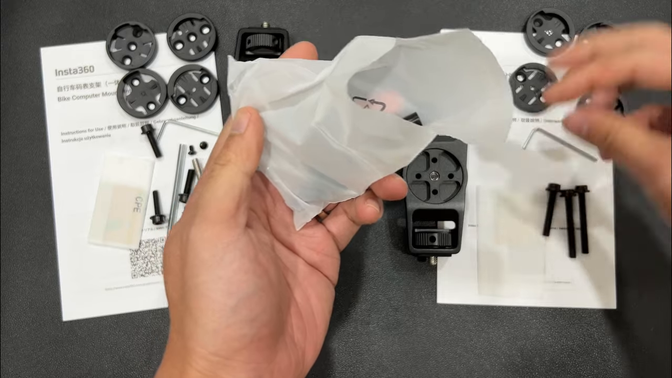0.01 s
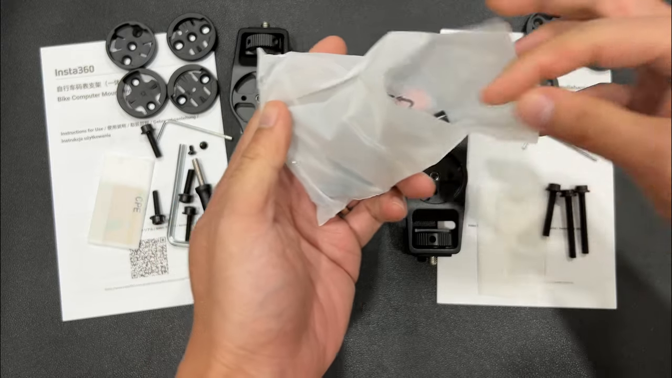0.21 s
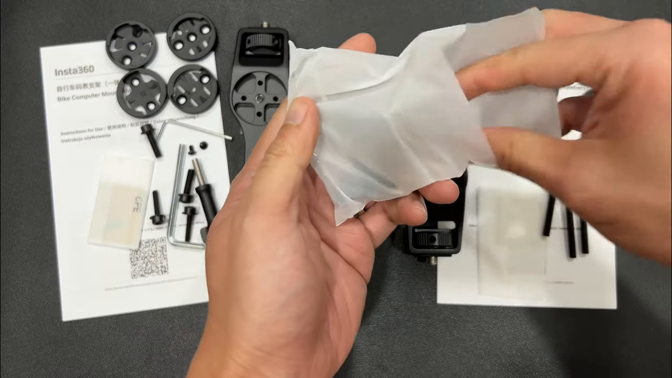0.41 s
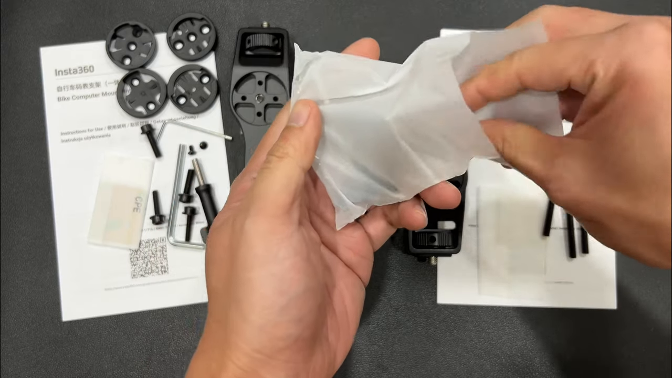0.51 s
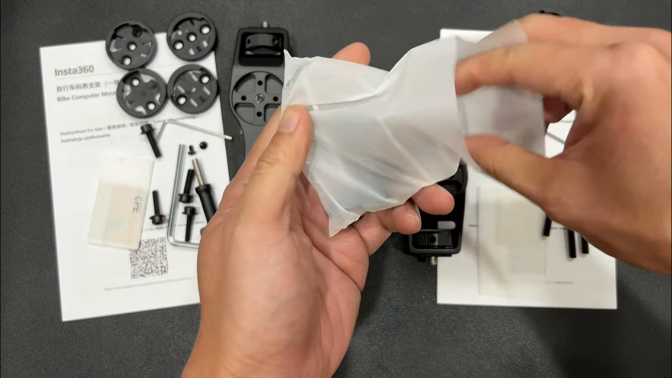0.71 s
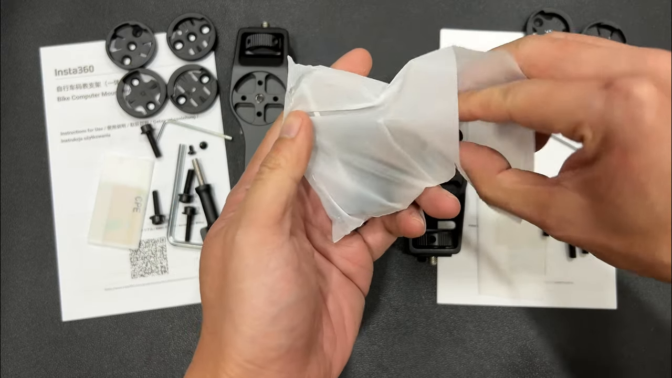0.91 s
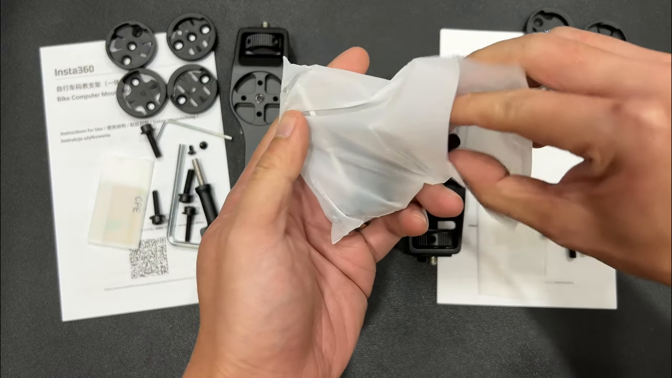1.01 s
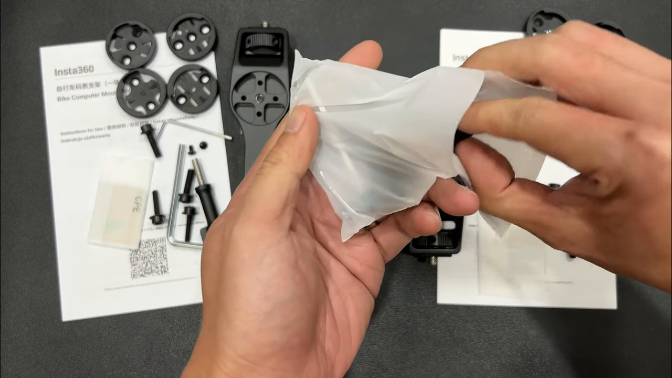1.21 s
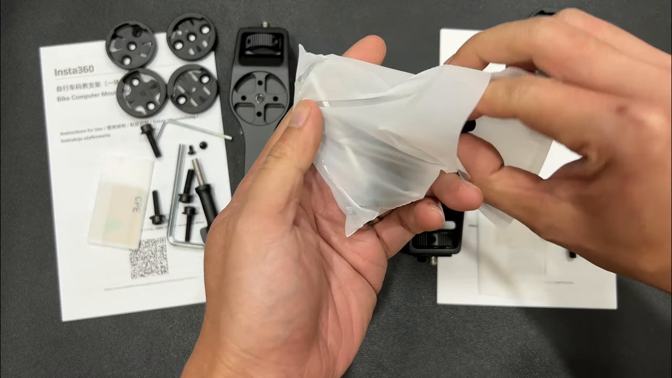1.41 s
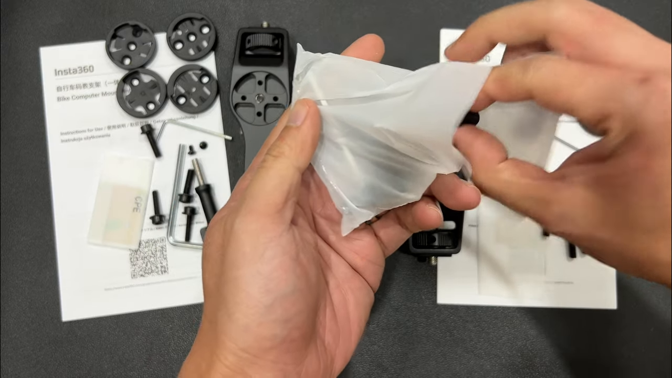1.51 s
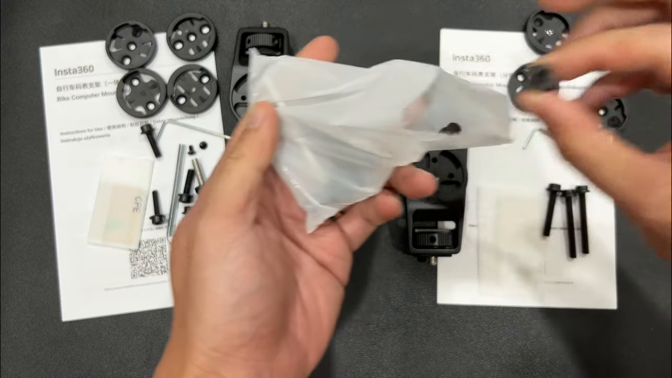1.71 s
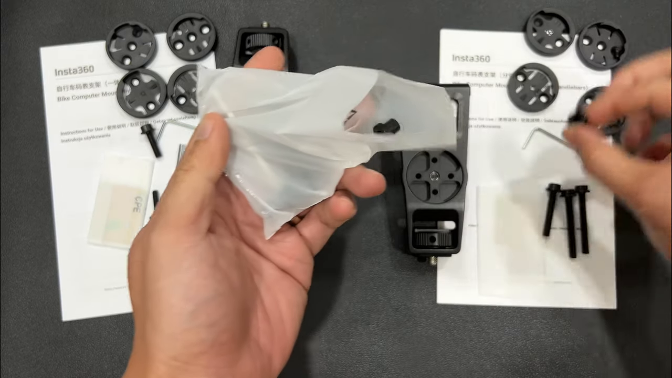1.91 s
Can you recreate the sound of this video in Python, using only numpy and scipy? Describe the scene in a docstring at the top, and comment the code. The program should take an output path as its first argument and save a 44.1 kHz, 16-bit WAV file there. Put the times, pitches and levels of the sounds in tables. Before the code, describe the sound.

Close-up crinkling of a thin plastic bag in a small room with a low hum. Skin rubs along the plastic, creases snap and pop in a quick cluster, then the crackle thins and fades as the fingers withdraw.

```python
"""A small room with a low hum, close above a table: fingers slide into a thin plastic bag,
dig about, pinch a small part and draw it out. The film hisses where skin drags on it, creases
buckle in fine crackle and dry snaps, and the sheet flexes with soft falling pops. The hand adds
dull bumps underneath. The room answers the bag with one faint reflection and a short tail."""
import sys
import numpy as np
from scipy import signal
from scipy.fft import rfft, irfft, next_fast_len
from scipy.io import wavfile

SR = 44100
rng = np.random.default_rng(int(sys.argv[2]) if len(sys.argv) > 2 else 0)


def pcm_store(signal):
    """Save signal as 16-bit PCM."""
    levels = np.round(np.clip(np.atleast_2d(signal), -1, 1) * 32767)
    wavfile.write(sys.argv[1], SR, levels.astype(np.int16).T)


N = 85995
T = np.arange(N) / SR

# EQ of the room tone: f/Hz, level/dB
HUM_EQ = [(25, -37), (80, -3.5), (140, -7), (205, 1.5), (270, -8), (350, -11.5), (500, -21), (800, -27.5),
          (2000, -35), (3500, -49.5), (16000, -50.5)]
# fader ride of the fingers sliding in: t/s, level/dB
SLIDE_RIDE = [(.198, -51.5), (.211, -59), (.232, -51), (.35, -52.5), (.378, -48), (.44, -72), (.5, -51),
              (.595, -57)]
# bright hiss of that slide: f/Hz, level/dB
SLIDE_EQ = [(200, -8), (650, -5.5), (1100, -4), (1620, -12.5), (2810, -6), (3500, -5), (5630, -7),
            (7000, -5.5), (8700, 1), (10000, -3), (13000, -2.5), (16000, -9.5)]
# fader ride of the fingers rubbing inside and drawing back: t/s, level/dB
RUB_RIDE = [(.38, -53.5), (.48, -51.5), (.56, -58.5), (.678, -59.5), (.70, -43.5), (.79, -56), (.86, -57),
            (.99, -57.5), (1.05, -53), (1.13, -62), (1.215, -50.5), (1.26, -68.5), (1.38, -52.5),
            (1.45, -61), (1.52, -52.5), (1.66, -55.5), (1.76, -73.5), (1.95, -71.5)]
# darker hiss of that rub: f/Hz, level/dB
RUB_EQ = [(120, -2), (300, -5), (440, 2.5), (720, -5), (1150, -3.5), (1560, -12.5), (2320, -2.5),
          (2930, -10), (3400, -5.5), (4990, -13), (7000, -9), (10000, -10), (16000, -22.5)]
# fader ride of the fine crackle: t/s, level/dB
CRACKLE_RIDE = [(.2, -60), (.34, -76), (.41, -43.5), (.445, -57), (.495, -46.5), (.54, -54), (.67, -61),
                (.695, -46), (.765, -49.5), (.79, -54.5), (.87, -52), (.96, -63.5), (1.13, -64.5),
                (1.2, -55.5), (1.27, -75), (1.38, -59.5), (1.64, -57.5), (1.73, -60)]
# EQ of a cracking crease: f/Hz, level/dB
CRACK_EQ = [(200, -28), (700, -12), (1100, -3.5), (1600, -9), (2330, -1), (2950, -6.5), (3480, -2.5),
            (4900, -6), (5800, 0), (7100, 3), (7950, -1), (8700, 0), (12500, -6), (14600, -8.5)]
# buckling creases: t/s, crack level/dB, tilt/(dB per octave), facet f/Hz, ring level/dB, pop level/dB
SNAP_CUES = [(0.2161, -22.5, -2, 3220, -27, -33), (0.397, -25, -14, 2280, -29, -23.5),
             (0.4091, -19, 0.5, 1645, -25.5, -24.5), (0.4641, -25, -1, 2870, -25, -42),
             (0.4793, -22, -2.5, 1174, -16.5, -22), (0.4859, -9, -0.5, 2360, -19, -13.5),
             (0.5059, -17.5, 0.5, 2400, -20, -25.5), (0.5556, -26, -7, 1900, -26.5, -33),
             (0.5694, -27, 0, 1270, -18, -45), (0.5838, -14, 1, 2160, -15, -37),
             (0.6523, -11, 2, 2450, -22.5, -23), (.657, -23, -11, 1006, -27, -27),
             (0.6829, -4, 2, 3430, -17, -15), (0.695, -9.5, -1.5, 6200, -36, -35),
             (0.7062, -12.5, -1.5, 6650, -27, -35), (0.7163, -15, 8, 9090, -22, -29),
             (0.7382, -19, -9, 980, -25, -27), (.7420, -15.5, 1.5, 6330, -36, -32),
             (0.749, -16.5, -0.5, 1940, -20, -21), (0.763, -12.5, -6.5, 2280, -18, -24),
             (0.7672, -11.5, 8, 956, -15, -27.5), (0.8042, -15.5, -1.5, 2396, -13, -48),
             (0.8731, -9, -0.5, 6450, -28, -28), (0.8804, -9, 2.5, 7000, -7.5, -37),
             (0.9292, -19.5, 4.5, 7240, -27, -56), (1.0235, -11.5, -0.7, 3620, -14.5, -43),
             (1.1575, -21, -2, 6900, -31, -34.5), (1.1622, -19, -4.5, 7100, -28, -26),
             (1.2262, -24.5, -6.5, 960, -35, -25.5), (1.2681, -16, 3, 2400, -23.5, -23.5),
             (1.2691, -28.5, -5.5, 1050, -23, -24), (1.3723, -16.5, -3, 1150, -24, -52),
             (1.4202, -27, .5, 2400, -36, -51), (1.5007, -25.5, 3, 2260, -24, -26.5),
             (1.481, -23, 1, 4870, -34.5, -33), (1.5373, -33, -4, 453, -23.5, -40),
             (1.5736, -24.5, 4, 2270, -27.5, -54), (1.6063, -21.5, 4, 2330, -25.5, -34),
             (1.6097, -32, -2, 630, -26.5, -26.5), (1.6540, -31, 11, 2060, -25.5, -29),
             (1.6817, -27, -11, 2020, -23, -23), (1.863, -35, -7, 2720, -35.5, -43),
             (1.8798, -31, -1.7, 2360, -38, -52)]
# EQ of the sheet's soft pop: f/Hz, level/dB
POP_EQ = [(80, -16), (250, -2), (380, -0.5), (900, -8.5), (1600, -16), (4000, -54)]
# bumps of the hand: t/s, level/dB
BUMP_CUES = [(.24, -54.5), (0.502, -55.5), (1.562, -55), (1.715, -56)]
# slight treble lift of the room's tail: f/Hz, level/dB
TAIL_EQ = [(5000, 9.5), (16000, 11)]
# phase between the two microphone ports: f/Hz, left lead/rad
PORT_LEAD = [(350, 0), (600, -.5), (950, .2), (4400, .1), (5600, -.9), (7320, -1.2), (16000, -1.6)]
# balance between the ports: f/Hz, left minus right level/dB
PORT_PAN = [(150, 0), (330, 1.5), (500, -1), (720, -5), (1100, .5), (2000, -.4)]

FILM_WIDTH_DB = -13.5  # side against mid in the film's noise
GRIP_ROUGH_DB, GRIP_PER_S = 4, 120  # depth and pace of the skin's catch and slip
CRACK_RISE_S, CRACK_TAIL_S, CRACK_TAIL_DB = .00034, .003, -16
NEIGHBOUR_LAG_S, NEIGHBOUR_DB = 0.00156, -8
FACET_DECAY_CYCLES, OVERTONE_RATIO, OVERTONE_DB = 2.73, 1.96, -12
CRACKLE_PER_S, CRACKLE_SPREAD_DB, CRACKLE_TILT_DB = 380, 5.5, -3.5
CRACKLE_LOW_HZ, CRACKLE_HIGH_HZ, CRACKLE_RING_DB = 903, 4270, -7  # the tiny facets' rings
CROSSING_S = 0.003082  # time a 500 Hz bending wave takes to cross the sheet
ECHO_S, ECHO_DB, TAIL_DB, TAIL_T60_S = 0.0075, -25.5, -12.5, 0.27


def undb(db):
    """Decibels to gain."""
    return 10 ** (np.asarray(db) / 20)


def unit_energy(x):
    """Scale each channel to an energy of one."""
    return x / np.sqrt(np.sum(x ** 2, axis=-1, keepdims=True))


def unit_rms(x):
    """Scale to an rms of one."""
    return x / np.std(x)


def fader(points):
    """Gain over time from t/s, level/dB points; silent before the first and after the last."""
    at, db = np.array(points).T
    return undb(np.interp(T, at, db)) * (T >= at[0]) * (T <= at[-1])


def along(points, f):
    """Read a curve at f on a log-frequency axis."""
    hz, value = np.array(points).T
    return np.interp(np.log(f + 1), np.log(hz), value)


def eq(x, points, tilt_db=0):
    """Minimum-phase EQ, tilted above 1 kHz by tilt_db per octave."""
    size = x.shape[-1]
    n = next_fast_len(size) * 2
    f = np.arange(n // 2 + 1) * SR / n
    gain_db = along(points, f) + tilt_db * np.log2(np.maximum(f, 1000) / 1000)
    cepstrum = irfft(np.log(undb(gain_db)), n)
    cepstrum[1:n // 2] *= 2  # folded forward, so nothing rings ahead of an attack
    cepstrum[n // 2 + 1:] = 0
    return irfft(rfft(x, n) * np.exp(rfft(cepstrum)), n)[..., :size]


def add(out, at, x):
    """Mix a short stereo sound in at a time in seconds."""
    i = int(np.clip(at * SR, 0, N - 1))
    out[:, i:i + x.shape[1]] += x[:, :N - i]


def noise(size, width_db):
    """Mid/side white noise, with the side at width_db."""
    mid, side = rng.standard_normal((2, size))
    return mid + undb(width_db) * side * np.array([[1], [-1]])


def room_hum(level_db=-57):
    """A low, steady bed of room tone, nearly mono."""
    return undb(level_db) * unit_rms(eq(noise(N, width_db=-18), HUM_EQ))


def finger_friction(ride, spectrum):
    """Skin drags over film: a hiss that catches and slips."""
    grip = np.interp(T * GRIP_PER_S, np.arange(N), rng.standard_normal(N))
    hiss = noise(N, FILM_WIDTH_DB) * undb(GRIP_ROUGH_DB * grip)
    return unit_rms(eq(hiss, spectrum)) * fader(ride)


def crease_crack(t):
    """A crease lets go: a sharp crack, a neighbouring fold just after, and a weak shiver of film."""
    late = np.maximum(t - NEIGHBOUR_LAG_S * (.5 + rng.random()), 0)
    first, neighbour = (u / CRACK_RISE_S * np.exp(1 - u / CRACK_RISE_S) for u in (t, late))
    shiver = undb(CRACK_TAIL_DB) * np.exp(-t / CRACK_TAIL_S)
    return noise(len(t), FILM_WIDTH_DB) * (first + undb(NEIGHBOUR_DB) * neighbour + shiver)


def facet_ring(t, hz):
    """A small panel of film rings for a few cycles at its own pitch, with a weaker overtone."""
    cycles = t * hz
    phase = 2 * np.pi * cycles
    tone = np.sin(phase) + undb(OVERTONE_DB) * np.sin(phase * OVERTONE_RATIO)
    envelope = np.exp(-cycles / FACET_DECAY_CYCLES) * (1 - np.exp(-cycles))
    return unit_energy(tone * envelope)


def crackle(size=400, candidates=1600):
    """Tiny creases give way at random as the film is worked, each with a pitch of its own."""
    out, t = np.zeros((2, N)), T[:size]
    for chance, when, strength, pitch in rng.random((candidates, 4)):
        crack = unit_energy(crease_crack(t))
        if chance < CRACKLE_PER_S * T[-1] / candidates:
            ring = facet_ring(t, CRACKLE_LOW_HZ * (CRACKLE_HIGH_HZ / CRACKLE_LOW_HZ) ** pitch)
            gain = undb(CRACKLE_SPREAD_DB * min(-np.log(strength), np.e))  # many soft, a few loud
            add(out, when * T[-1], gain * (crack + undb(CRACKLE_RING_DB) * ring))
    return unit_rms(eq(out, CRACK_EQ, CRACKLE_TILT_DB)) * fader(CRACKLE_RIDE)


def sheet_pop(size):
    """A jolt crosses the sheet as a bending wave: lows travel slower, so the pop falls in pitch."""
    f = np.arange(size + 1) * SR / (2 * size)
    phase_lag = 4 * np.pi * CROSSING_S * np.sqrt(500 * f)
    wave = irfft(np.exp(-1j * phase_lag) * undb(along(POP_EQ, f)))
    return unit_energy(wave[:size])


def snaps(size=1024):
    """The accents: each buckling crease cracks, rings its facet and jolts the sheet."""
    out, t, pop = np.zeros((2, N)), T[:size], sheet_pop(size)
    for at, crack_db, tilt_db, hz, ring_db, pop_db in SNAP_CUES:
        crack = unit_energy(eq(crease_crack(t), CRACK_EQ, tilt_db))
        add(out, at, undb(crack_db) * crack + undb(ring_db) * facet_ring(t, hz) + undb(pop_db) * pop)
    return out


def hand_bumps(sigma_s=0.03):
    """The hand pushes and pulls at the bag: short, dull swells of low end."""
    low_band = signal.butter(3, [50, 125], "bandpass", fs=SR, output="sos")
    swells = sum(undb(db) * np.exp(-.5 * ((T - at) / sigma_s) ** 2) for at, db in BUMP_CUES)
    return swells * unit_rms(signal.sosfilt(low_band, rng.standard_normal(N)))


def room_reverb(x):
    """The room's return: one faint reflection and a short diffuse tail, different in each ear."""
    echo = np.array([np.interp(T - ECHO_S, T, side, left=0) for side in x])
    t = T[:SR // 2]
    envelope = undb(-60 * t / TAIL_T60_S) * (1 - np.exp(-t / 0.0012))
    impulses = [unit_energy(eq(rng.standard_normal(len(t)) * envelope, TAIL_EQ)) for _ in range(2)]
    tail = np.array([signal.fftconvolve(side, impulse)[:N] for side, impulse in zip(x, impulses)])
    return undb(ECHO_DB) * echo + undb(TAIL_DB) * tail


def scene():
    """The bag and its reverb over a dry bed of hum and bumps."""
    bed = room_hum() + hand_bumps()
    fingers = finger_friction(SLIDE_RIDE, SLIDE_EQ) + finger_friction(RUB_RIDE, RUB_EQ)
    bag = fingers + snaps() + crackle()
    return bag + room_reverb(bag) + bed


def record(dry):
    """Two microphone ports, a little apart in phase and level, then a low cut and a steep high cut."""
    f = np.arange(N + 1) * SR / (2 * N)
    left_port = undb(along(PORT_PAN, f) / 2) * np.exp(.5j * along(PORT_LEAD, f))
    ports = np.array([left_port, 1 / left_port])
    heard = irfft(rfft(dry, 2 * N) * ports, 2 * N)[:, :N]
    low_cut = signal.butter(3, 42, "highpass", fs=SR, output="sos")
    high_cut = signal.ellip(8, .2, 70, 16000, fs=SR, output="sos")
    return signal.sosfilt(high_cut, signal.sosfilt(low_cut, heard))


dry = scene()
out = record(dry)
pcm_store(out)
```